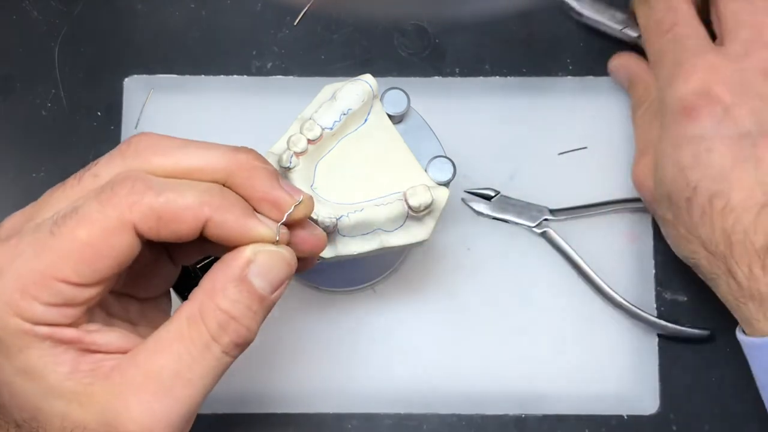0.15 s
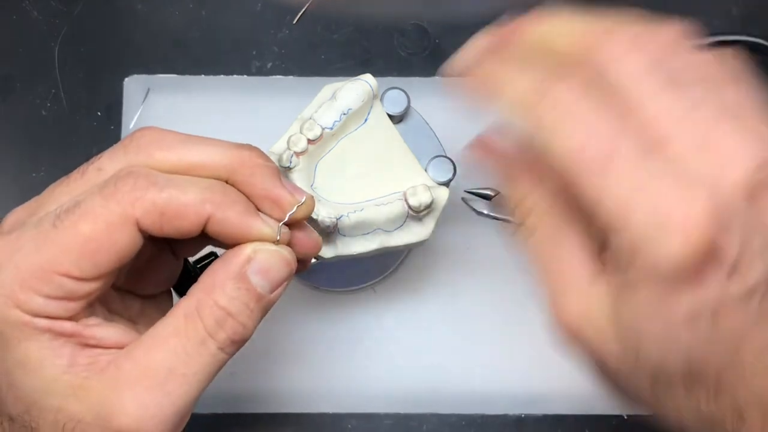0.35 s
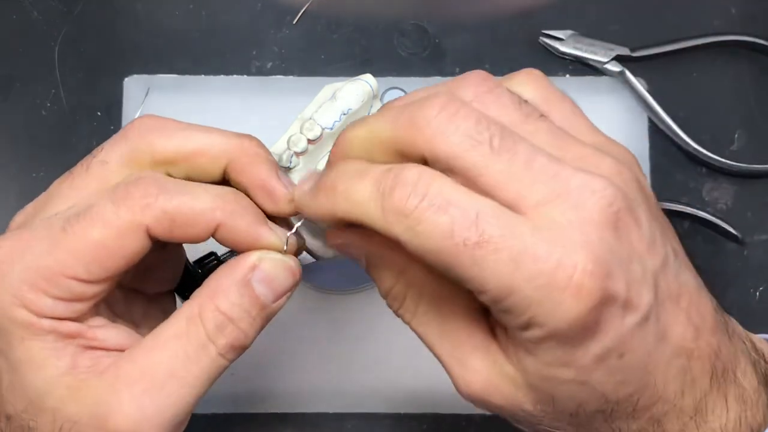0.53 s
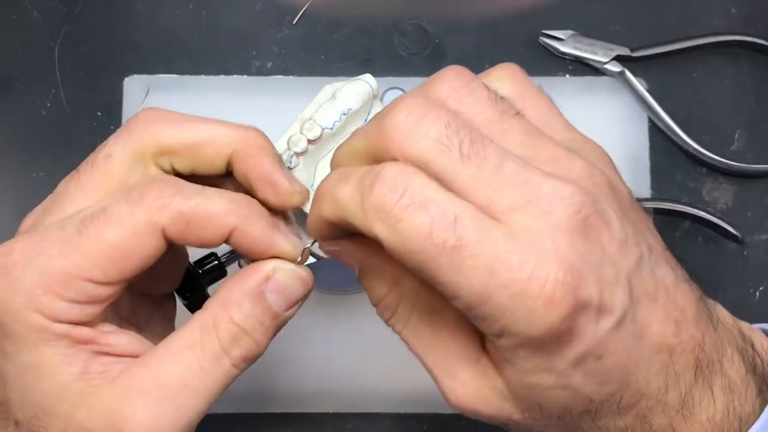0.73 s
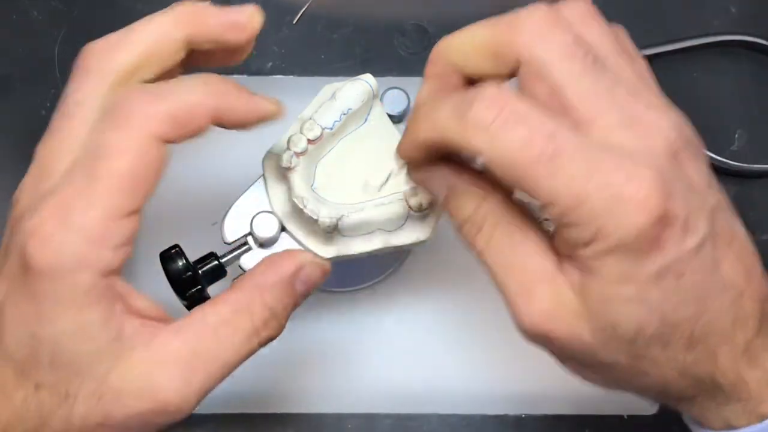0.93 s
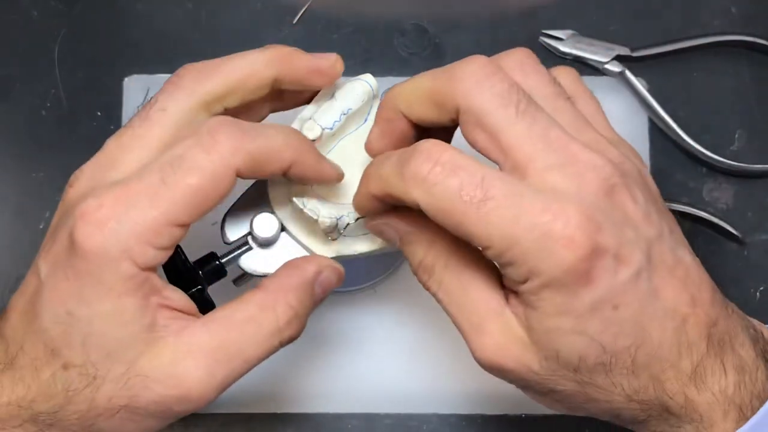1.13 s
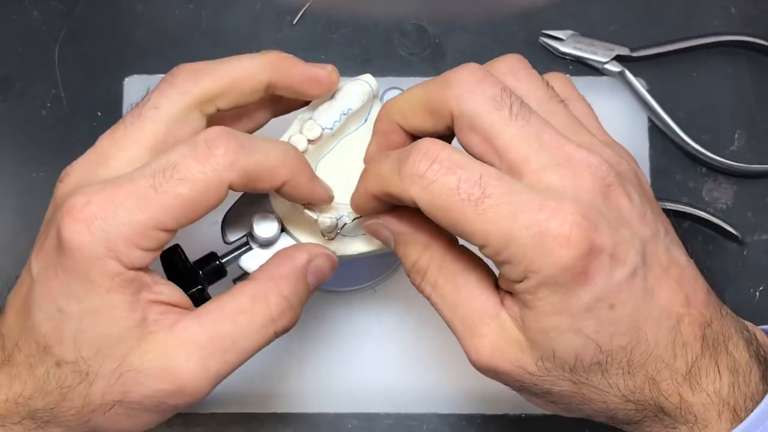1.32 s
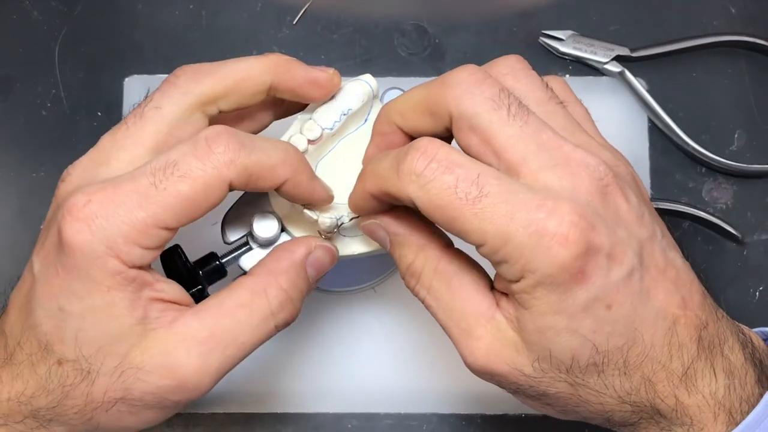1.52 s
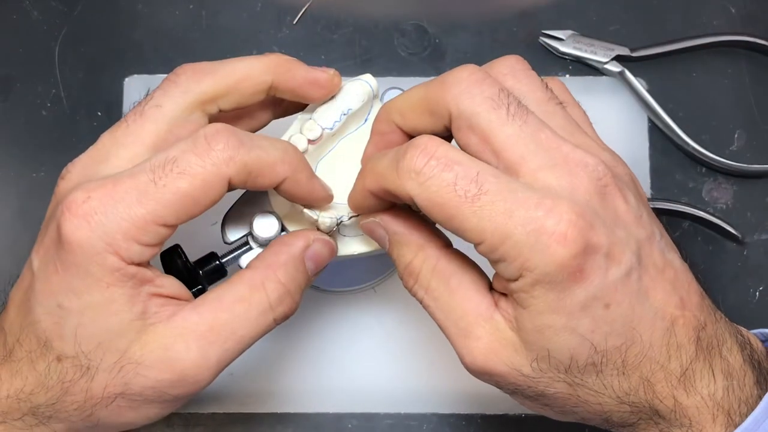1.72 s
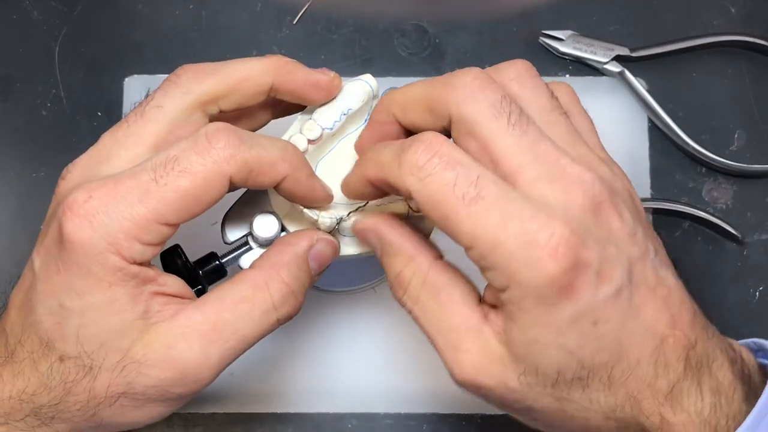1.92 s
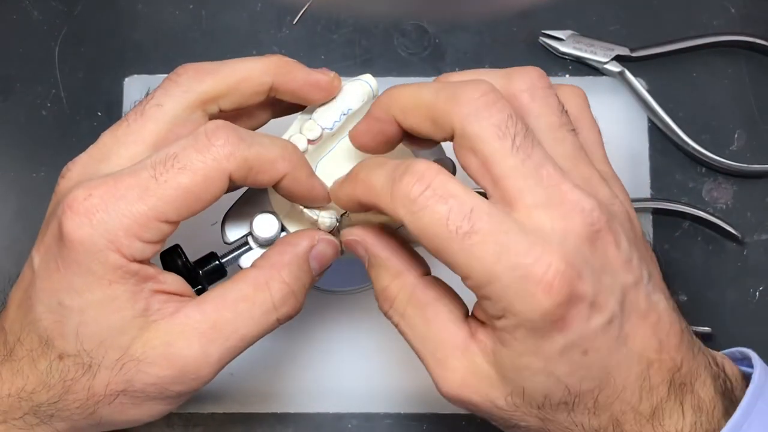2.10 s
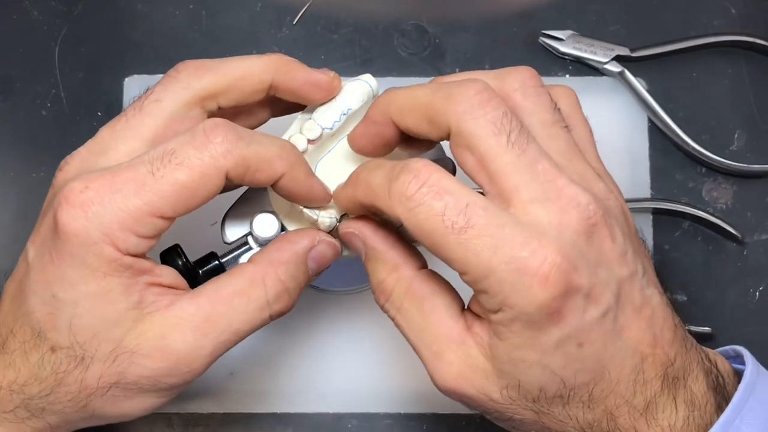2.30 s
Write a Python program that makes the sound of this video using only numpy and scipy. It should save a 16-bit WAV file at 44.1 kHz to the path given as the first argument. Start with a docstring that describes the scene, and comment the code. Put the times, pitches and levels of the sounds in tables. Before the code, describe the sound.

Small steel pliers clink at the joint and land on a bench with one loud, close clack and quick bounces; then quiet skin rustle and faint wire ticks on plaster, over low ventilation rumble in a room.

```python
"""A pair of small steel pliers is dropped on a work bench: its joint clinks, then jaws and handles land and bounce.
Metal and wood are decaying sines struck by touches; noise bursts add the cracks. Later fingers press a thin wire
onto a plaster cast with faint ticks, a soft slide and skin rustles. Filtered noise makes the ventilation rumble
and the narrow hiss bands of a distant machine; the recorder's limiter ducks all at the blow."""
import sys
import numpy as np
from scipy import signal
from scipy.fft import rfft, irfft
from scipy.io import wavfile
from scipy.ndimage import uniform_filter1d, minimum_filter1d

SR = 44100
rng = np.random.default_rng(int(sys.argv[2]) if len(sys.argv) > 2 else 0)


def generate_wav(sig):
    """Save sig (samples, or channels by samples) to the path in sys.argv[1] as 16-bit PCM at SR."""
    pcm = np.round(np.clip(np.atleast_2d(sig).T, -1, 1) * 32767).astype(np.int16)
    wavfile.write(sys.argv[1], SR, pcm)


def convert_level_to_amplitude(level_db):
    """Map a level in decibels to its linear amplitude factor."""
    exponent = np.asarray(level_db, float) / 20
    return 10 ** exponent


N = 103635  # length [samples]


def at_hz(points, hz):
    """Reads a table of (frequency, value) on a log-frequency axis."""
    table_hz, values = np.transpose(points)
    return np.interp(np.log(hz), np.log(table_hz), values)


def rms_one(x):
    """Scales to rms 1."""
    return x / np.sqrt(np.mean(x ** 2) + 1e-20)


def drift(points_per_s):
    """Slow random wander: straight lines between normal random points."""
    points = rng.standard_normal(size=N // 100)
    return np.interp(np.arange(N) / SR * points_per_s, np.arange(N // 100), points)


def coloured(spectrum):
    """Steady noise with a given spectrum; rms 1."""
    hz = np.maximum(np.arange(N // 2 + 1) * SR / N, 1)
    white = rfft(rng.standard_normal(N))
    return rms_one(irfft(white * convert_level_to_amplitude(at_hz(spectrum, hz)), N))


def narrow_noise(hz, width_hz):
    """Noise sent twice through a resonance of the given width; rms 1."""
    radius = np.exp(-np.pi * width_hz / SR)
    zeros = [1, 0, -1]
    poles = [1, -2 * radius * np.cos(2 * np.pi * hz / SR), radius ** 2]
    once = signal.lfilter(zeros, poles, rng.standard_normal(N + SR))
    twice = signal.lfilter(zeros, poles, once)
    return rms_one(twice[SR:])  # leaves out the build-up


def ring(clicks, hz, t60):
    """A damped resonance: a unit click sets a sine of height 1 ringing, 60 dB down after t60 seconds."""
    radius = convert_level_to_amplitude(-60 / (t60 * SR))
    w = 2 * np.pi * hz / SR
    return signal.lfilter([0, np.sin(w)], [1, -2 * radius * np.cos(w), radius ** 2], clicks + 1e-18)


def strike(times, levels_db, modes, spread_db):
    """Each touch excites every mode with a random strength; signs alternate from mode to mode."""
    out = np.zeros(N)
    at = (np.asarray(times) * SR).astype(int)
    chance = rng.standard_normal((len(at), len(modes)))
    for k, (hz, db, t60) in enumerate(modes):
        clicks = np.zeros(N)
        strength = convert_level_to_amplitude(levels_db + db + spread_db * chance[:, k])
        np.add.at(clicks, at, strength * (-1) ** k)
        out += ring(clicks, hz, t60)
    return out


def burst(start_s, db, decay_s):
    """A puff of noise that starts at once and dies exponentially, with time constant decay_s."""
    t = np.arange(N) / SR - start_s
    envelope = (t >= 0) * np.exp(-np.clip(t, 0, 1) / decay_s)
    return convert_level_to_amplitude(db) * envelope * rng.standard_normal(N)


def background():
    """Duct rumble and broad ventilation hiss, gently uneven, under narrow bands of machine hiss."""
    # duct rumble: (frequency [Hz], relative density [dB])
    rumble_spectrum = [(12, -46), (20, -20.5), (48, -5), (64, 0), (80, -11), (104, 2.5), (120, -4),
                       (145, -18), (200, -50.5), (330, -120)]
    # ventilation hiss: (frequency [Hz], relative density [dB])
    air_spectrum = [(88, -39), (150, -3.5), (374, -17), (429, -22.5), (1090, -25.5), (1880, -31.5),
                    (2120, -33), (3120, -38.5), (4020, -37.5), (4980, -46), (6050, -36), (6670, -44),
                    (7790, -44.5), (10400, -49.5), (15700, -39)]
    # machine hiss: (frequency [Hz], resonance width [Hz], mean level [dB])
    whistle_bands = [(2130, 110, -71.5), (3960, 135, -75.5), (6145, 220, -75.5), (7600, 22, -78),
                     (7500, 150, -74.5), (8370, 460, -78), (11500, 940, -77.5), (15100, 400, -82)]
    machine = np.zeros(N)
    for hz, width_hz, db in whistle_bands:
        machine += convert_level_to_amplitude(db + 1.4 * drift(6.49)) * narrow_noise(hz, width_hz)
    rumble = convert_level_to_amplitude(-33.5) * coloured(rumble_spectrum)
    air = convert_level_to_amplitude(-50 + 0.3 * drift(3.77)) * coloured(air_spectrum)
    return rumble + air + machine


def clinks():
    """The loose joint knocks steel on steel: bright modes ring and a tiny noise puff marks each contact."""
    # joint knocks: (time [s], level [dB])
    knocks = [(0.0373, -26), (.0385, -27.5), (0.0528, -30), (.0605, -42.5)]
    # modes of the joint: (frequency [Hz], level [dB], t60 [s])
    joint_modes = [(4470, -2, 0.017), (5660, -0.5, 0.0154), (6360, 0, 0.0064), (9400, -3.5, 0.021),
                   (10700, -4, 0.0076), (13500, -6, 0.0063), (15500, -11, .022)]
    times, levels_db = np.transpose(knocks)
    ringing = strike(times, levels_db - 7, joint_modes, spread_db=4.5)
    puffs = sum(burst(s, db - 11, decay_s=0.0039) for s, db in knocks)
    return ringing + puffs


def landings():
    """Each landing is a short chatter of touches that rings bench and steel, with a noisy crack."""
    # impacts on the bench: (time [s], thud [dB], knock [dB], steel [dB], chatter length [s])
    impacts = [(0.0967, -31, -42, -53.5, .012), (0.2397, 4.5, -2, -1.5, .010), (0.259, -13, 0, 1, 0.0091),
               (0.273, -12.5, -12.5, -17.5, 0.00503), (0.3013, -12, -15, -13, 0.0049),
               (0.3174, -36, -23, -26, 0.0044)]
    # bench top moving as a whole: (frequency [Hz], level [dB], t60 [s])
    thud_modes = [(183, -3.5, .05), (223, -3.5, 0.055), (287.4, 2, 0.071), (322.7, -4.5, 0.1),
                  (393, -7.5, 0.027)]
    # knock of the bench: (frequency [Hz], level [dB], t60 [s])
    knock_modes = [(435, -7, 0.026), (567, -1.5, 0.033), (663.4, -4.5, .03), (754, -3, 0.032),
                   (858, -2.5, 0.028), (999, -4, 0.043), (1230.5, 0, .03), (1400, -2.5, 0.025),
                   (1557, -3, .025), (2000, -6, 0.013)]
    # jaws and handles: (frequency [Hz], level [dB], t60 [s])
    steel_modes = [(2470, -5.5, 0.02), (3120, 1, 0.0099), (3493, -2, 0.016), (3930, 1.5, 0.0095),
                   (4385, -4, 0.0094), (5486, -6.5, .01), (6300, -6.5, 0.0094), (6810, -9.5, 0.0067),
                   (7700, -9, 0.0059), (9120, -18, 0.0435), (10650, -23, 0.002), (11730, -10.5, .006),
                   (12900, -5, 0.0075), (14230, -7, 0.0072)]
    touches_per_s, sag_db, spread_db = 1500, 7, 4.5
    crack_db, crack_low_hz = -1, 3000  # level against the steel column; strongest below crack_low_hz
    touches, crack = [], np.zeros(N)
    for s, thud, knock, steel, length in impacts:
        late = np.r_[0, np.cumsum(rng.exponential(1, size=24)) / touches_per_s]
        # later touches are weaker, and a long chatter shares its energy among more of them
        share_db = 10 * np.log10(1 + length * touches_per_s)
        sag = np.where(late < length, -sag_db * late / length - share_db, -np.inf)
        touches.append([s + late, thud + sag, knock + sag, steel + sag])
        crack += burst(s, steel + crack_db, decay_s=0.73 * length)
    times, thud_db, knock_db, steel_db = np.hstack(touches)
    pole = np.exp(-2 * np.pi * crack_low_hz / SR)
    crack = signal.lfilter([1 - pole], [1, -pole], crack) + convert_level_to_amplitude(-20.5) * crack
    thuds = strike(times, thud_db, thud_modes, spread_db=1.5)
    bench = thuds + strike(times, knock_db, knock_modes, spread_db)
    return bench + convert_level_to_amplitude(-3.5) * strike(times, steel_db, steel_modes, spread_db) + crack


def rustles():
    """Skin rustles softly as the hands move: bell-shaped swells of band noise with an uneven level."""
    # swells: (middle [s], length [s], level [dB], low edge [Hz], high edge [Hz])
    swells = [(0.864, 0.21, -66, 3000, 12000), (1.332, .1, -74.5, 1194, 4000)]
    t, out = np.arange(N) / SR, np.zeros(N)
    for middle, length, db, low_hz, high_hz in swells:
        band_pass = signal.butter(1, [low_hz, high_hz], "band", fs=SR, output="sos")
        band = signal.sosfilt(band_pass, rng.standard_normal(N))
        swell = np.exp(-(2 * (t - middle) / length) ** 2)
        out += convert_level_to_amplitude(db + 2.5 * drift(30.36)) * swell * rms_one(band)
    return out


def wire():
    """Wire ticks on plaster: noise puffs excite a dull ring, and a faint narrow hiss slides by at the last ones."""
    # ticks: (time [s], puff level [dB], ring frequency [Hz], t60 [s])
    taps = [(0.801, -50, 14000, 0.0034), (1.190, -58, 2534, 0.011), (1.323, -54, 2000, .01),
            (1.6964, -41.5, 1520, .012), (1.698, -47, 3000, 0.0069), (1.7131, -42, 1760, 0.0075)]
    out = np.zeros(N)
    for s, db, hz, t60 in taps:
        puff = burst(s, db, decay_s=0.0049)
        out += 0.29 * ring(puff, hz, t60)
        if hz < 9000:  # the brightest ticks have no crack
            out += convert_level_to_amplitude(2.5) * signal.lfilter([0.3], [1, -0.7], puff)
    slide_start_s, slide_length_s = 1.686, 0.36
    phase = np.clip((np.arange(N) / SR - slide_start_s) / slide_length_s, 0, 1)
    slide = np.sin(np.pi * phase) ** 0.5 * narrow_noise(hz=1727, width_hz=150)
    return out + convert_level_to_amplitude(-62) * slide


def room(x):
    """Diffuse tail of unit energy: half-octave bands of noise, each dying at its own rate."""
    # reverberation: (frequency [Hz], t60 [s])
    reverb_times = [(150, 0.25), (350, 0.49), (800, 0.6), (1500, 0.52), (4000, 0.34), (9000, 0.32),
                    (16000, .14)]
    t = np.arange(SR) / SR
    tail = np.zeros(SR)
    edges = np.geomspace(100, 17000, 16)
    for low, high in zip(edges, edges[1:]):
        band_pass = signal.butter(2, [low, high], "band", fs=SR, output="sos")
        band = signal.sosfilt(band_pass, rng.standard_normal(SR))
        tail += band * convert_level_to_amplitude(-60 * t / at_hz(reverb_times, np.sqrt(low * high)))
    tail *= np.clip(t / 0.0046, 0, 1)  # fades in over 4.6 ms
    return signal.fftconvolve(x, tail / np.sqrt(np.sum(tail ** 2)))[:N]


def scene():
    """Pliers and wire, direct and through the room, over the background and the rustles."""
    # small objects radiate no deep bass
    low_cut = signal.butter(2, 170, "high", fs=SR, output="sos")
    near = signal.sosfilt(low_cut, landings() + clinks() + wire())
    top_cut = signal.ellip(8, 0.5, 40, 15750, fs=SR, output="sos")
    quiet = signal.sosfilt(top_cut, background() + rustles())
    return (near + convert_level_to_amplitude(-20.5) * room(near) + quiet)[None]


def band_limit(x):
    """A steep low-pass at the top of the band."""
    return signal.sosfilt(signal.butter(12, 16740, fs=SR, output="sos"), x)


def record(dry):
    """The recorder: a look-ahead limiter with slow release, rounded peaks and a treble cut."""
    limit_db, release_db_per_s, ahead_s = 2.5, 13, 0.0025
    over = np.maximum(20 * np.log10(np.abs(dry[0]) + 1e-9) - limit_db, 0)
    # gain reduction jumps up with each peak, then falls at the release rate
    ramp = release_db_per_s * np.arange(N) / SR
    held = np.maximum.accumulate(over + ramp) - ramp
    # it spreads ahead of the peak and is smoothed
    ahead = int(ahead_s * SR)
    widened = -minimum_filter1d(-held, size=2 * ahead + 1)
    reduction_db = np.maximum(uniform_filter1d(widened, size=ahead), 0)
    rounded = np.tanh(dry * convert_level_to_amplitude(-reduction_db))
    top_cut = signal.cheby2(10, 40, 16750, fs=SR, output="sos")
    mix = signal.sosfilt(top_cut, rounded)
    return band_limit(mix)


dry = scene()
out = record(dry)
generate_wav(out)
```